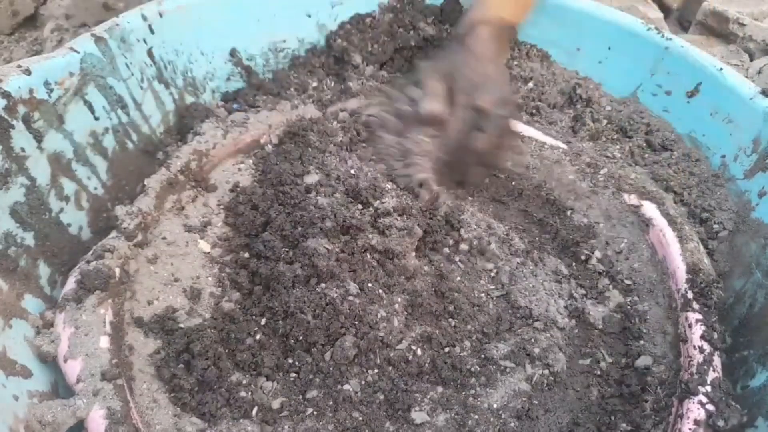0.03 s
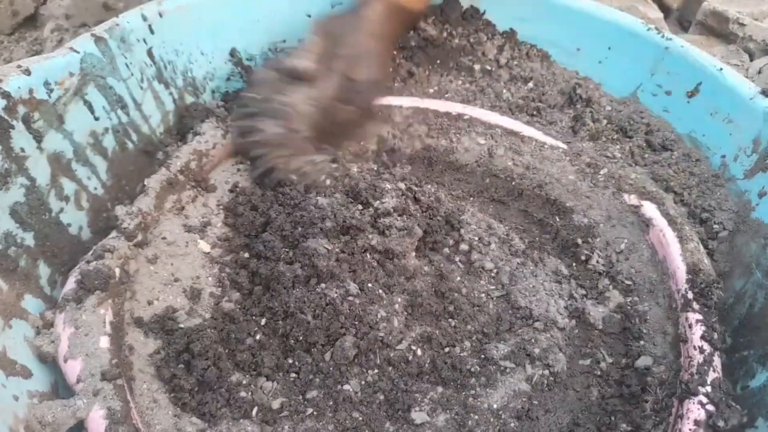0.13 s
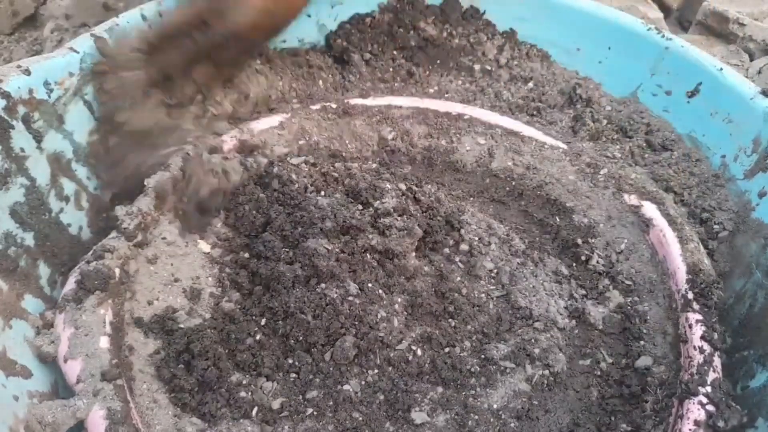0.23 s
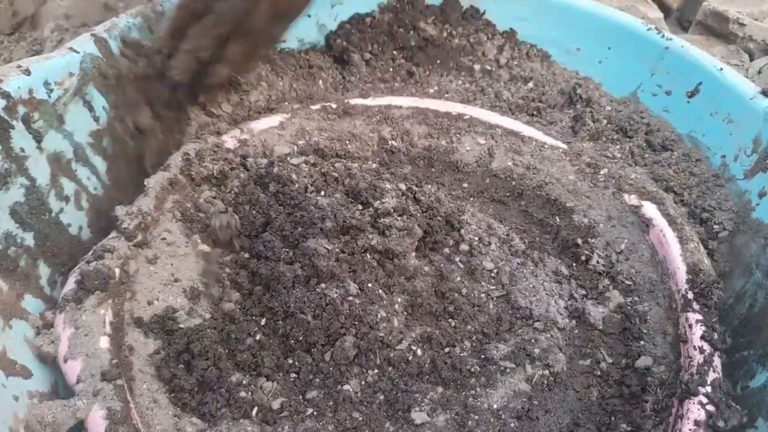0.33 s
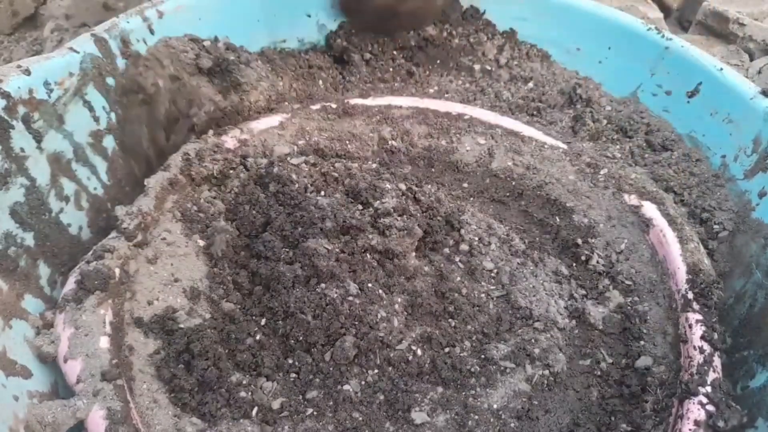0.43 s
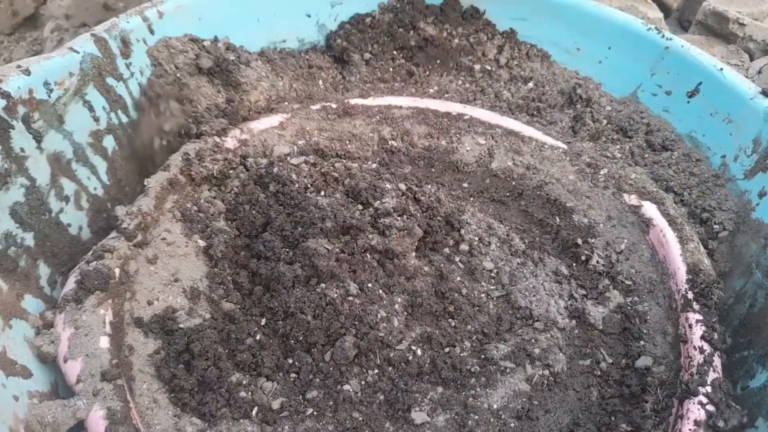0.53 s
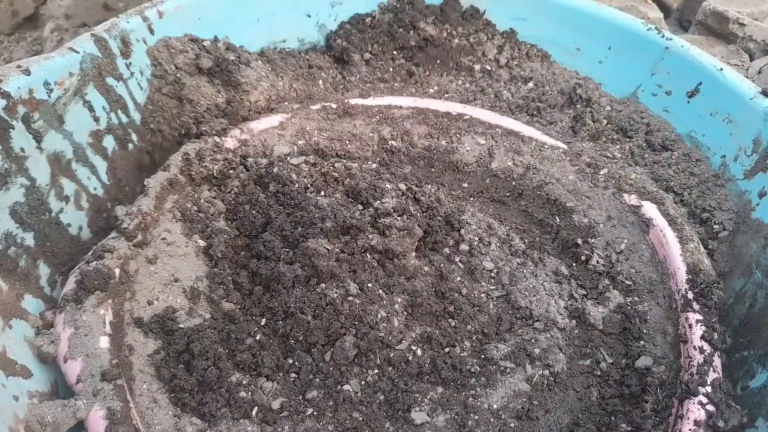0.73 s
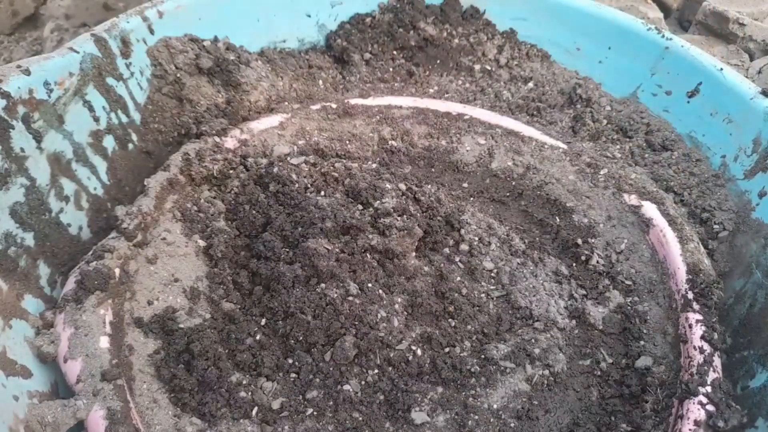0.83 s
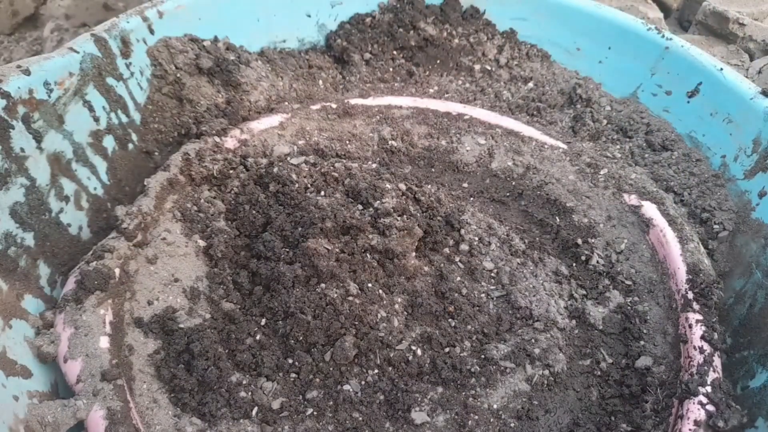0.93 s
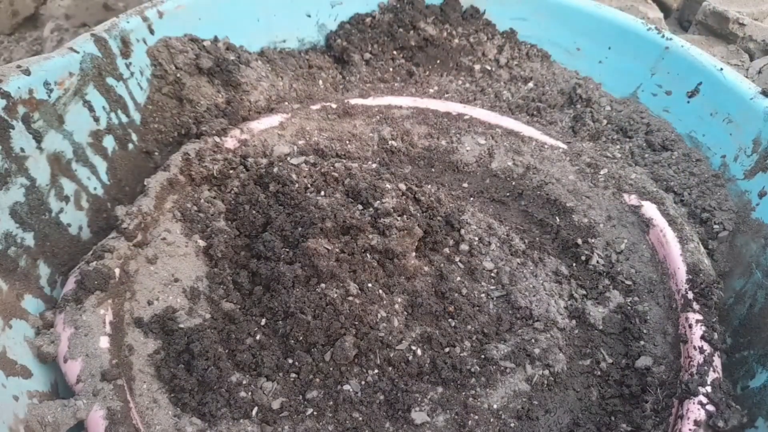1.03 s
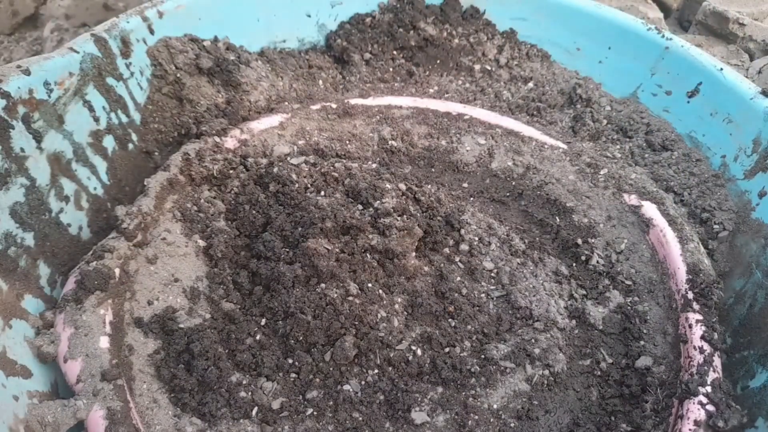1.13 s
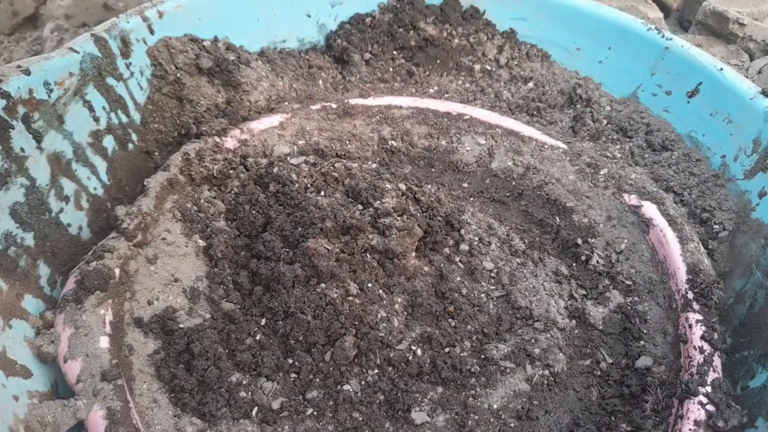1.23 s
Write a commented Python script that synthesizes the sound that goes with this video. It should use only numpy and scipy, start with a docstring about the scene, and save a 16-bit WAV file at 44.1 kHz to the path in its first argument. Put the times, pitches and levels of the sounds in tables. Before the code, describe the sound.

Soil hits a plastic tub wall with one crunchy thud, then crumbs tick down faintly.

```python
"""A lump of gritty soil is swept across a plastic tub and smacked against its wall: a knock, then a crunch.
The knock is the ringing wall over a brief boom of the base; the crunch is clouds of grain clicks.
Two pieces drop back on the plastic, crumbs tick down and loose soil rustles faintly.
A low drone, like a far engine, lies underneath in outdoor rumble. Close, dry and almost mono."""
import sys
import numpy as np
from scipy import signal
from scipy.fft import rfft, irfft, next_fast_len
from scipy.io import wavfile
from scipy.ndimage import uniform_filter1d

SR = 44100
rng = np.random.default_rng(int(sys.argv[2]) if len(sys.argv) > 2 else 0)


def waveform_to_disk(signal):
    """Save audio, clipped to [-1, 1], as 16-bit WAV at the path in sys.argv[1]."""
    frames = np.transpose(np.atleast_2d(signal))
    scaled = np.clip(frames, -1, 1) * 32767
    samples = np.round(scaled).astype(np.int16)
    wavfile.write(sys.argv[1], SR, samples)


N = 57330
TIME_S = np.arange(N) / SR

# Lumps hitting the wall. Each row: start in seconds, level in dB, contact cut-off in Hz.
WALL_HITS = [(.093, -36, 2200), (.2163, -19, 1300), (.232, -28, 5000), (.243, -29, 4000),
             (.2491, -6.5, 6000), (.2502, -6, 1100), (.2578, -22, 2500), (.2632, -8, 330), (.27, -8, 520),
             (.2775, -24, 3000), (.283, -22, 2500), (.2957, -18, 7000), (.3065, -19, 2200),
             (.317, -18, 1200), (.3412, -29, 1100), (.3677, -33, 3000), (.3923, -12, 1550),
             (.409, -41, 2500), (.4245, -37, 2600), (.4385, -35, 2000), (.4432, -12.5, 780),
             (.885, -34, 2000), (.942, -34, 2000), (.96, -37, 1500), (1.0485, -41, 2200),
             (1.2135, -41, 2400)]
# Soil landing on the base. Each row: start in seconds, level in dB.
BASE_HITS = [(.2575, -23), (.297, -21.5)]
# Modes of the wall and the loaded base. Each row: frequency in Hz, gain in dB, T60 in seconds.
WALL_MODES = [(395, -21, .06), (485, -21, .06), (660, -12, .014), (860, -3, .019), (1140, -1, .016),
              (1550, -3, .013), (2030, -2, .01), (2450, -6, .008), (3100, -8.5, .008), (3900, -7, .006),
              (5500, -8, .004), (7300, -10, .004)]
BASE_MODES = [(71, -7, .14), (119, 0, .09)]
# One sign per wall mode.
WALL_MODE_SIGNS = [1, 1, -1, 1, -1, -1, 1, -1, 1, -1, 1, -1]
SPOT_SPREAD_DB, SPOT_DETUNE = 1.1, .018  # each spot on the wall rings a little differently

# Grain cloud envelopes. Each: start, attack, hold and release T60 in seconds, level in dB.
GRAZE_ENVELOPE = (.229, .003, .014, .018, -34)
CRUSH_ENVELOPE = (.249, .002, .012, .052, -22)
SPRAY_ENVELOPE = (.271, .016, .010, .09, -25.3)
SLUMP_ENVELOPE = (.254, .006, .054, .04, -28)
TRICKLE_ENVELOPE = (.635, .025, .05, .25, -58)
BURST_GRAINS_PER_S, SPRAY_GRAINS_PER_S, LOOSE_GRAINS_PER_S = 4000, 3000, 7000
BUNCH_S, BUNCH_DB = .002, 2.1

# Single grains snapping or landing. Each row: start in seconds, relative level in dB.
GRAIN_TICKS = [(.2325, -20), (.2438, -22), (.2494, -1), (.2501, -5), (.2604, -12), (.2664, -19),
               (.281, -15), (.2874, -6), (.2901, -7), (.2924, -3), (.2962, -12), (.3045, -15), (.3085, -16),
               (.3125, -17), (.3672, -26), (.368, -20), (.386, -31), (.4255, -33), (.437, -30), (.44, -31),
               (.4682, -29), (.493, -33), (.559, -31), (.5835, -38), (.7678, -36), (.9833, -32),
               (1.0502, -31), (1.1091, -34), (1.136, -34), (1.1964, -38), (1.2253, -39), (1.237, -38)]
TICK_T60_S, TICK_TAIL_GAIN = .005, .19
# Soil sliding before and after the blow. Each row: time in seconds, level in dB.
SLIDE_LEVELS = [(0, -40), (.06, -39), (.13, -43), (.18, -43), (.225, -40), (.335, -50), (.42, -50),
                (.48, -55), (.555, -54), (.59, -71), (.69, -65), (.81, -72), (.98, -57), (1.07, -59),
                (1.1, -73), (1.24, -60), (1.3, -66)]
# Small shifts of soil. Each row: centre and half width in seconds, level in dB, resonance in Hz.
SOIL_SHIFTS = [(.86, .014, -49, 2600), (.895, .012, -42, 1500), (.925, .013, -51, 1700),
               (.946, .005, -39.5, 2100), (.961, .004, -42.5, 1900), (1.049, .003, -50, 1800),
               (1.185, .02, -57, 2000), (1.215, .002, -47, 2200), (1.228, .008, -49.5, 1800)]

# Far drone. Each row: time in seconds, pitch in Hz, level in dB.
DRONE_TRACK = [(0.0, 74.2, -45), (0.202, 76.3, -37), (0.318, 73.3, -35), (0.39, 74.9, -43),
               (0.668, 77.4, -43), (0.9, 77.1, -36), (1.096, 73.3, -46), (1.3, 75.6, -50)]
# Its harmonics. Each row: multiple of the pitch, gain in dB.
DRONE_HARMONICS = [(1, -1), (2, -11)]
# Outdoor rumble. Each row: time in seconds, level in dB.
RUMBLE_LEVELS = [(0, -39.5), (.45, -40), (.6, -41.5), (.95, -39.5), (1.1, -42.5), (1.3, -42.5)]

# Spectra of the soil sounds and the rumble. Each row: frequency in Hz, relative gain in dB.
GRAZE_SPECTRUM = [(300, -9), (1100, 0), (2500, -6), (4800, -11), (6500, -6), (10000, -22), (15500, -31)]
CRUSH_SPECTRUM = [(100, -8), (250, -7), (390, 4), (620, -3), (860, 1), (1250, -8), (1560, 1), (2500, -10),
                  (3500, -14), (4800, -22), (7000, -15), (10000, -29), (15500, -36)]
SPRAY_SPECTRUM = [(300, -10), (900, -4), (1700, 0), (3700, -1.5), (5000, -8), (8800, -8.5), (10800, -20),
                  (15500, -22)]
SLUMP_SPECTRUM = [(20, -25), (50, -9), (80, -3), (125, 3), (190, -6), (260, -5), (350, 1), (490, 1),
                  (720, -6), (1100, -5), (2000, -12), (4000, -28), (9000, -34), (15500, -44)]
TICK_SPECTRUM = [(300, -14), (1500, 0), (3500, 3), (8000, 1.5), (11000, -4), (14500, -7), (16000, -13)]
SLIDE_SPECTRUM = [(150, -4), (400, -1), (750, 0), (1100, -3), (1550, 1), (2400, -2.5), (3500, -4),
                  (4900, -16), (7200, -15), (10000, -25), (15500, -29)]
RUSTLE_SPECTRUM = [(150, -8), (400, 0), (700, 2), (1100, -3), (1550, 1), (2500, -2), (3500, -5),
                   (4700, -14), (6000, -12), (7500, -17), (10000, -26), (15500, -32)]
TRICKLE_SPECTRUM = [(1000, -18), (3500, -8), (5800, 0), (8000, -6), (11000, -10), (15500, -16)]
RUMBLE_SPECTRUM = [(20, -5), (45, -2), (65, 0), (100, -1), (140, 2.5), (190, -7), (270, -8), (380, -18),
                   (600, -22), (1000, -26), (2000, -32), (4000, -37), (7000, -41), (10000, -48),
                   (15500, -54)]


def wall_knocks():
    """Each lump gives the wall a short push; the softer the lump, the duller the ring."""
    out = np.zeros(N + SR)
    age_s = np.arange(SR // 8) / SR
    for start_s, level_db, cutoff_hz in WALL_HITS:
        contact = np.minimum(2 * np.pi * cutoff_hz * age_s, 60)
        push = contact * np.exp(-contact)
        push *= from_db(level_db) / push.sum()
        at = int(start_s * SR)
        for sign, (hz, mode_db, t60_s) in zip(WALL_MODE_SIGNS, WALL_MODES):
            gain = sign * from_db(mode_db + SPOT_SPREAD_DB * rng.standard_normal())
            spot_hz = hz * (1 + SPOT_DETUNE * rng.standard_normal())
            out[at:at + len(age_s)] += gain * ring(push, spot_hz, t60_s)
    return out[:N]


def base_thuds():
    """The soil's weight makes the tub's base boom briefly."""
    push = np.zeros(N)
    for start_s, level_db in BASE_HITS:
        push[int(start_s * SR)] = from_db(level_db)
    return sum(from_db(mode_db) * ring(push, hz, t60_s) for hz, mode_db, t60_s in BASE_MODES)


def lump_burst():
    """The lump grazes the heap, is crushed on the wall, sprays grit and slumps down."""
    graze = envelope(*GRAZE_ENVELOPE) * grain_cloud(GRAZE_SPECTRUM, BURST_GRAINS_PER_S, spread_db=4)
    crush = envelope(*CRUSH_ENVELOPE) * grain_cloud(CRUSH_SPECTRUM, BURST_GRAINS_PER_S, spread_db=3)
    spray = envelope(*SPRAY_ENVELOPE) * grain_cloud(SPRAY_SPECTRUM, SPRAY_GRAINS_PER_S, spread_db=4)
    slump = envelope(*SLUMP_ENVELOPE) * grain_cloud(SLUMP_SPECTRUM, BURST_GRAINS_PER_S, spread_db=2.5)
    return graze + crush + spray + slump


def grain_ticks():
    """Hard grains click with a short gritty tail, among sparse finer crumbs."""
    ticks = np.zeros(N + SR)
    age_s = np.arange(SR // 50) / SR
    decay = np.exp(-np.log(1000) * age_s / TICK_T60_S)
    for start_s, level_db in GRAIN_TICKS:
        tick = TICK_TAIL_GAIN * rng.standard_normal(len(age_s)) * decay
        tick[0] = 1
        at = int(start_s * SR)
        ticks[at:at + len(age_s)] += from_db(level_db - 3) * tick
    crumbs = from_db(-73) * unit_rms(grain_clicks(per_s=70, spread_db=5))
    return colour(ticks[:N] + crumbs, TICK_SPECTRUM)


def loose_soil():
    """Fine soil slides throughout, shifts in short pitched rustles and trickles once."""
    slide = level_curve(SLIDE_LEVELS) * grain_cloud(SLIDE_SPECTRUM, LOOSE_GRAINS_PER_S, spread_db=3)
    rustles = np.zeros(N)
    for centre_s, half_width_s, level_db, hz in SOIL_SHIFTS:
        grit = grain_cloud(RUSTLE_SPECTRUM, LOOSE_GRAINS_PER_S, spread_db=3)
        pitched = unit_rms(resonance(grit, hz, q=2.6))
        swell = np.exp(-.5 * ((TIME_S - centre_s) / half_width_s) ** 2)
        rustles += from_db(level_db) * swell * unit_rms(pitched + from_db(-1) * grit)
    sand = grain_cloud(TRICKLE_SPECTRUM, LOOSE_GRAINS_PER_S, spread_db=2)
    return slide + rustles + envelope(*TRICKLE_ENVELOPE) * sand


def far_drone():
    """Two low harmonics waver in pitch and level, like a far engine."""
    times_s, pitch_hz, level_db = np.transpose(DRONE_TRACK)
    cycles = np.cumsum(np.interp(TIME_S, times_s, pitch_hz)) / SR + rng.random()
    tone = sum(from_db(db) * np.sin(2 * np.pi * multiple * cycles) for multiple, db in DRONE_HARMONICS)
    return np.sqrt(2) * from_db(np.interp(TIME_S, times_s, level_db)) * tone


def outdoor_rumble():
    """Low noise with faint hiss, drifting in level."""
    return level_curve(RUMBLE_LEVELS) * unit_rms(colour(rng.standard_normal(N), RUMBLE_SPECTRUM))


def grain_clicks(per_s, spread_db):
    """Random clicks of uneven size and either sign, louder in short bunches."""
    bunches = unit_rms(uniform_filter1d(rng.standard_normal(N), size=int(BUNCH_S * SR)))
    size_db = spread_db * np.minimum(rng.exponential(1, N), 3) + BUNCH_DB * np.clip(bunches, -2, 2)
    signs = rng.choice([-1, 1], N)
    hits = rng.random(N) < per_s / SR
    return from_db(size_db) * signs * hits


def grain_cloud(spectrum, per_s, spread_db):
    """Filtered grain clicks at unit rms."""
    return unit_rms(colour(grain_clicks(per_s, spread_db), spectrum))


def envelope(start_s, attack_s, hold_s, t60_s, level_db):
    """Linear rise, hold, exponential decay."""
    age_s = TIME_S - start_s
    rise = np.clip(age_s / attack_s, 0, 1)
    decay = np.exp(-np.log(1000) * np.maximum(age_s - attack_s - hold_s, 0) / t60_s)
    return from_db(level_db) * rise * decay


def level_curve(points):
    """Gain over time through (seconds, dB) points."""
    return from_db(np.interp(TIME_S, *np.transpose(points)))


def colour(x, spectrum):
    """Minimum-phase filter through (Hz, dB) points."""
    size = 2 * next_fast_len(N)
    hz, db = np.transpose(spectrum)
    bins_hz = np.arange(size // 2 + 1) * SR / size
    curve_db = np.interp(np.log(bins_hz + 1), np.log(hz), db)
    cepstrum = irfft(np.log(from_db(curve_db)))
    cepstrum[1:size // 2] *= 2
    cepstrum[size // 2 + 1:] = 0
    return irfft(rfft(x, size) * np.exp(rfft(cepstrum)))[:N]


def ring(push, hz, t60_s):
    """One mode: a unit click starts a decaying sine of height 1."""
    radius = np.exp(-np.log(1000) / (t60_s * SR))
    angle = 2 * np.pi * hz / SR
    return signal.lfilter([0, np.sin(angle)], [1, -2 * radius * np.cos(angle), radius ** 2], push + 1e-18)


def resonance(x, hz, q):
    """Band-pass with unit peak gain."""
    radius = np.exp(-np.pi * hz / q / SR)
    feedback = [1, -2 * radius * np.cos(2 * np.pi * hz / SR), radius ** 2]
    return signal.lfilter(np.array([1, 0, -1]) * (1 - radius ** 2) / 2, feedback, x + 1e-18)


def from_db(db):
    return 10 ** (np.asarray(db) / 20)


def unit_rms(x):
    return x / np.sqrt(np.mean(x ** 2) + 1e-20)


def scene(side_db=-8.5, side_from_hz=9800):
    """All centred; only the top treble flickers between the sides."""
    mid = wall_knocks() + base_thuds() + lump_burst() + grain_ticks() + loose_soil()
    mid += far_drone() + outdoor_rumble()
    highpass = signal.butter(8, side_from_hz, "high", fs=SR, output="sos")
    treble_power = uniform_filter1d(signal.sosfilt(highpass, mid) ** 2, size=128)
    hiss = unit_rms(signal.sosfilt(highpass, rng.standard_normal(N)))
    side = from_db(side_db) * np.sqrt(np.abs(treble_power)) * hiss
    return np.array([mid + side, mid - side])


def record(dry):
    """Steep low-pass at 16 kHz."""
    return signal.sosfilt(signal.ellip(10, .1, 80, 16000, fs=SR, output="sos"), dry)


dry = scene()
out = record(dry)
waveform_to_disk(out)
```